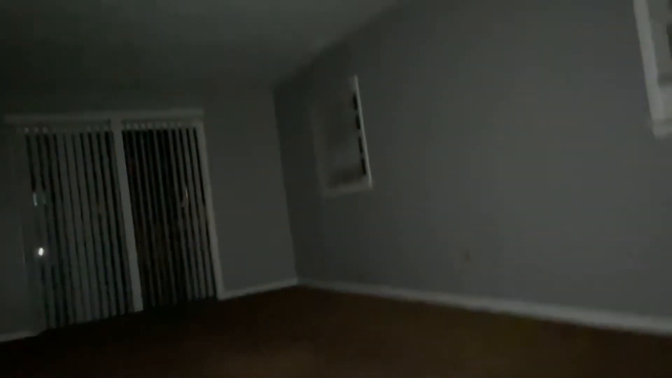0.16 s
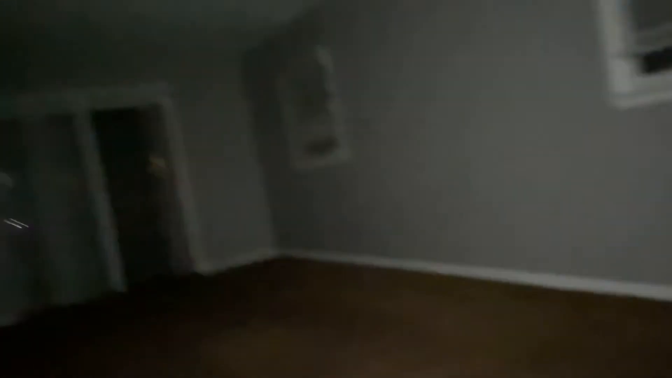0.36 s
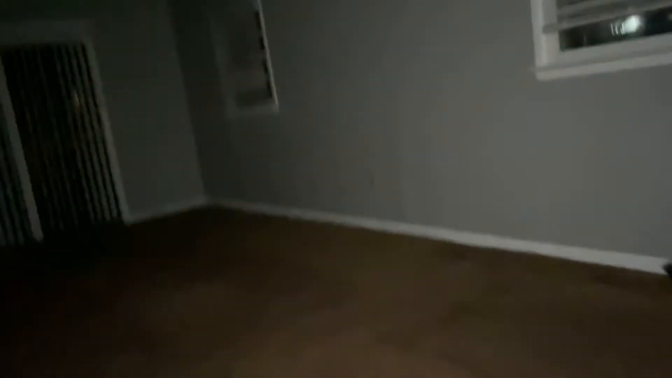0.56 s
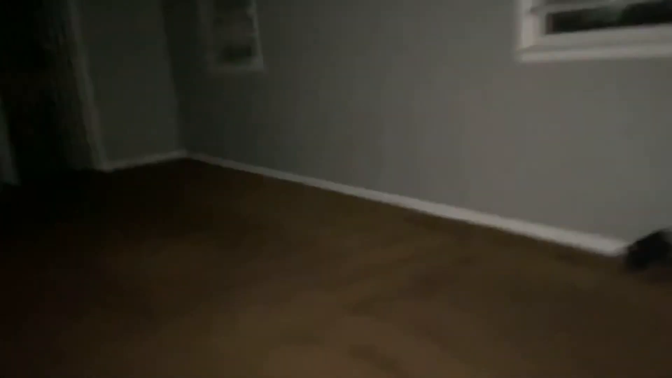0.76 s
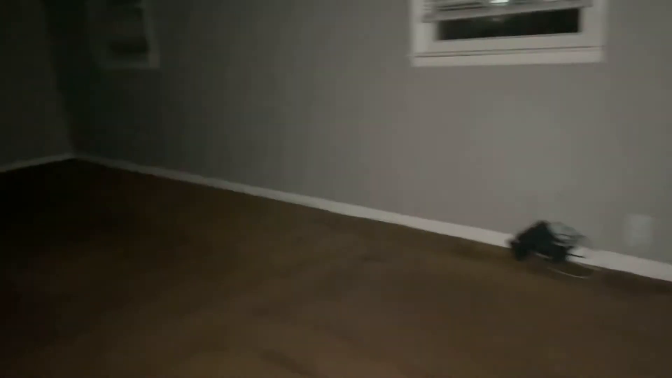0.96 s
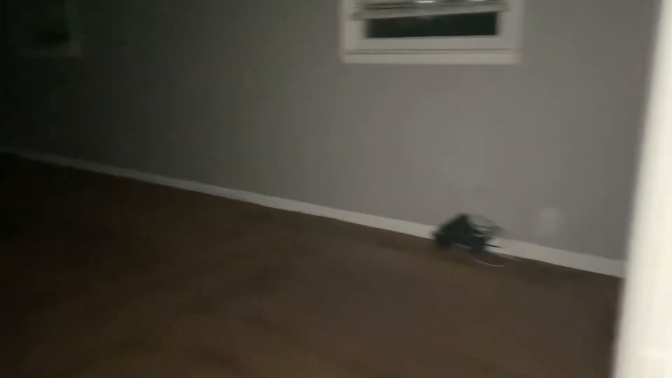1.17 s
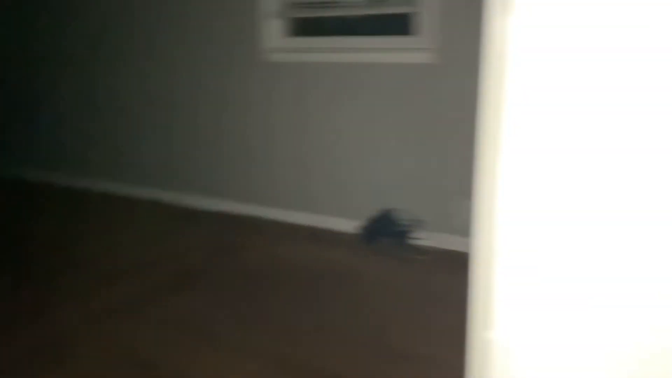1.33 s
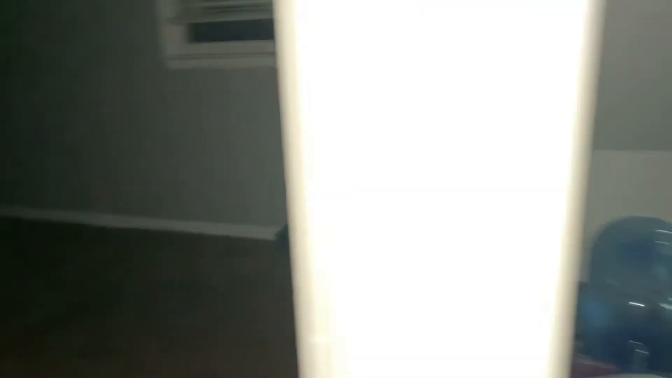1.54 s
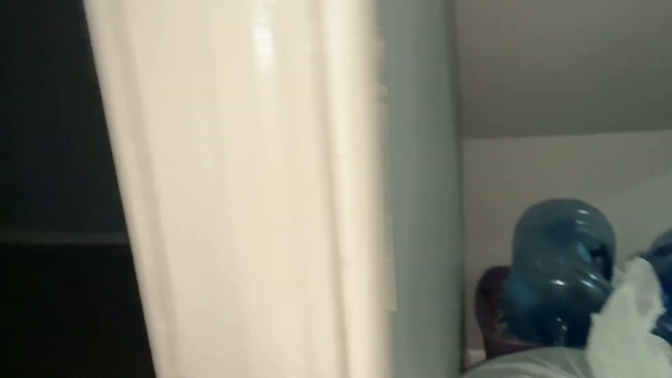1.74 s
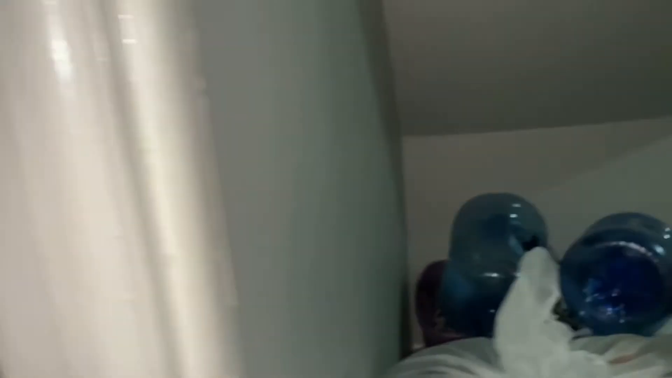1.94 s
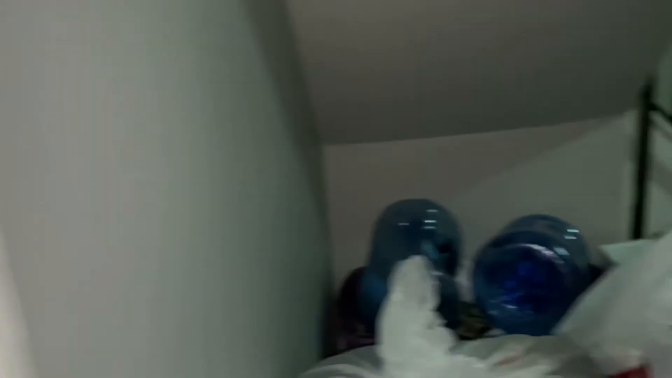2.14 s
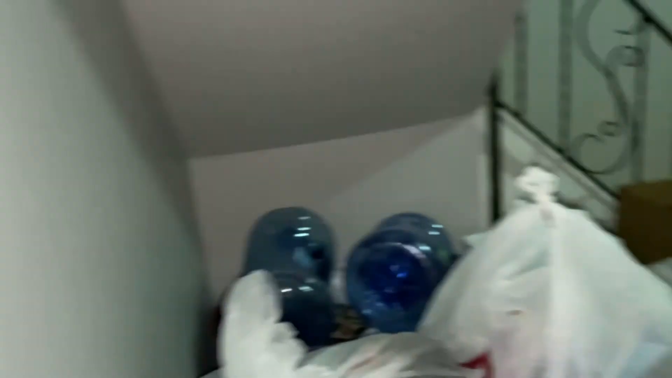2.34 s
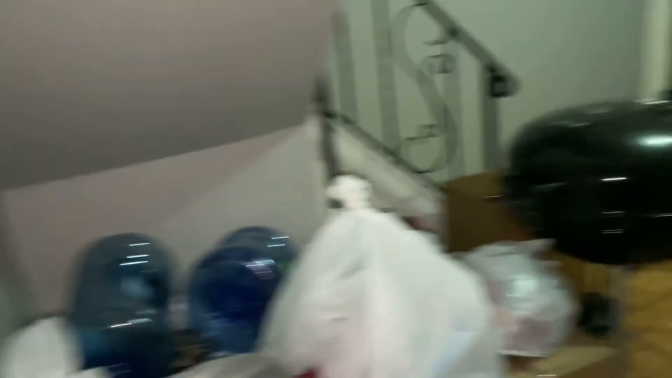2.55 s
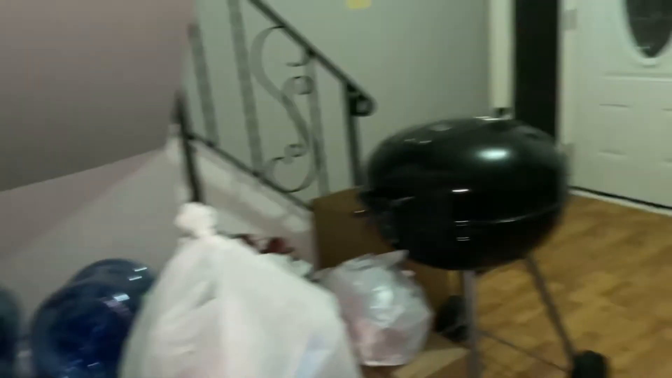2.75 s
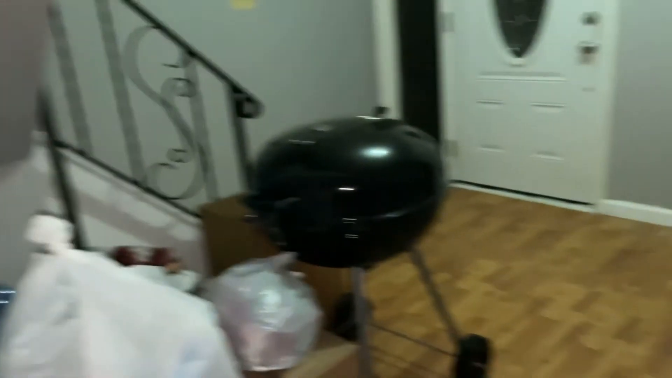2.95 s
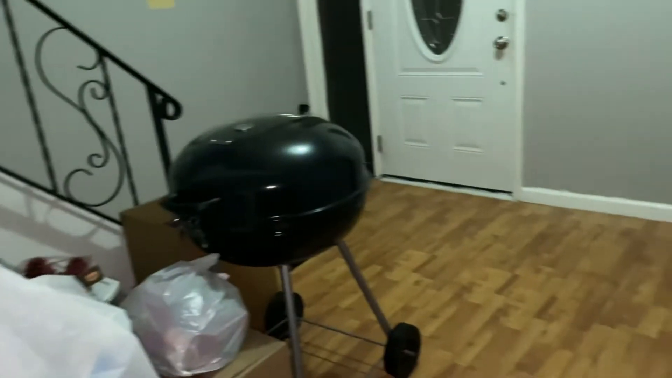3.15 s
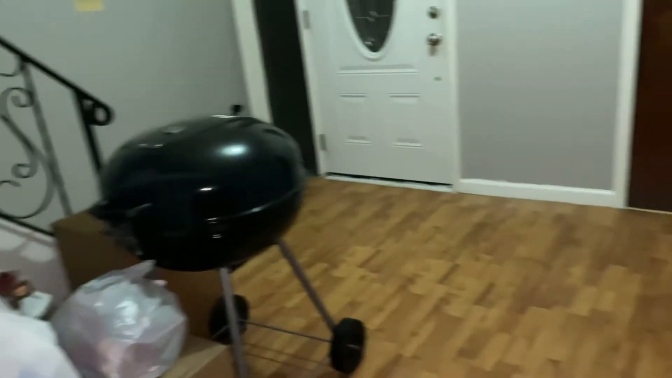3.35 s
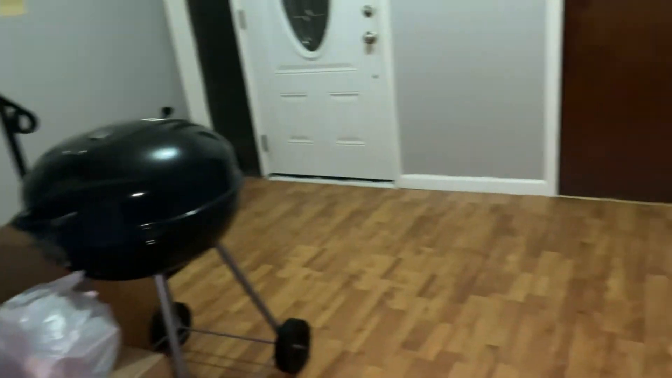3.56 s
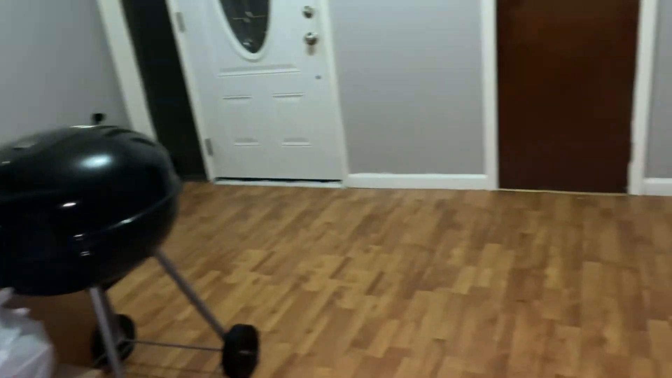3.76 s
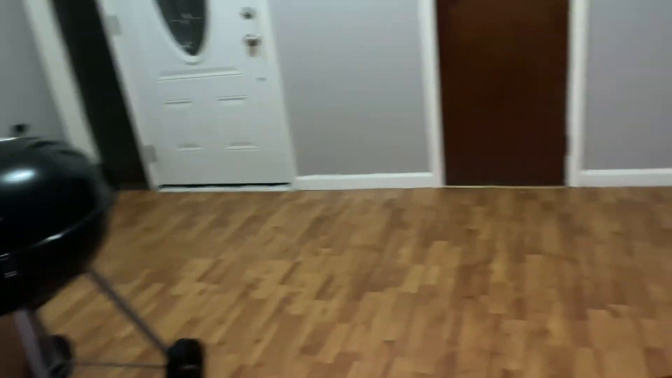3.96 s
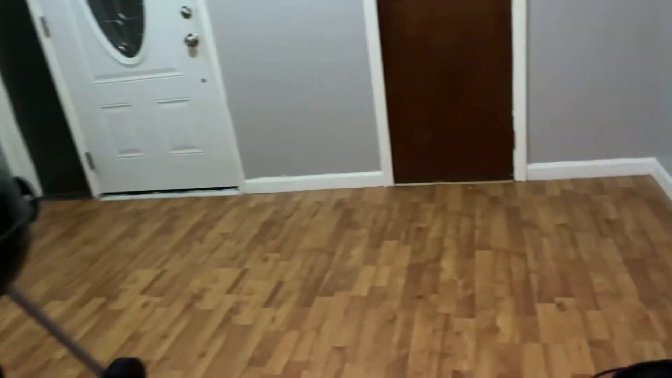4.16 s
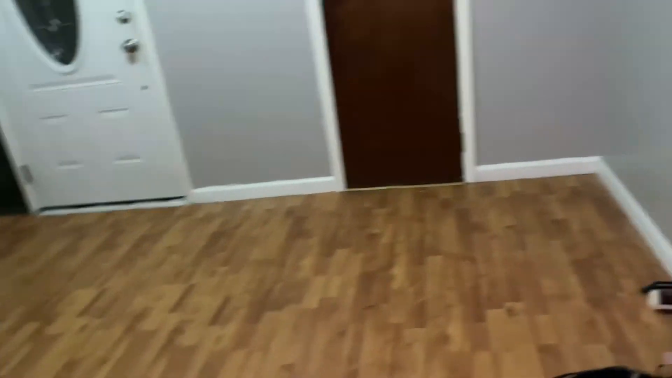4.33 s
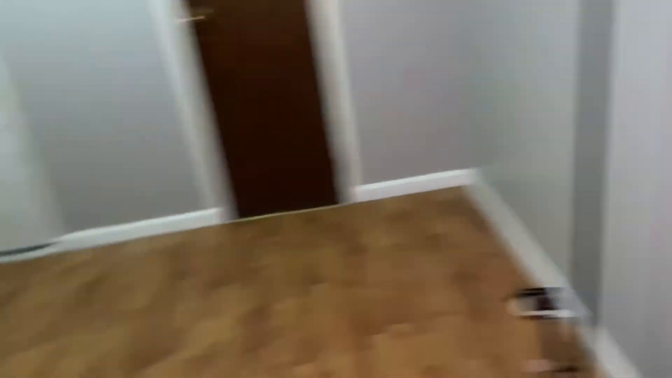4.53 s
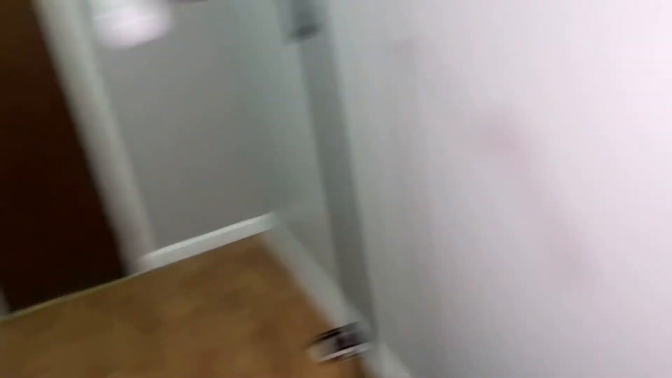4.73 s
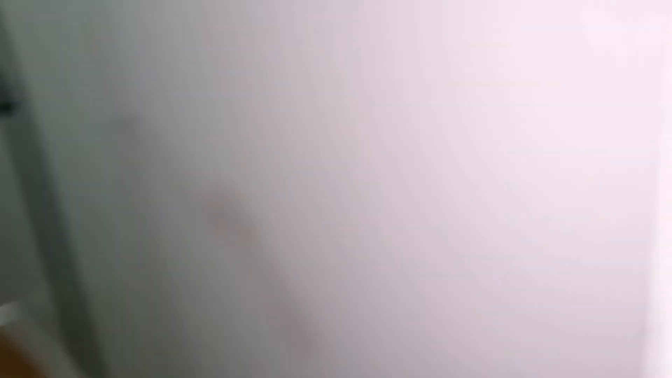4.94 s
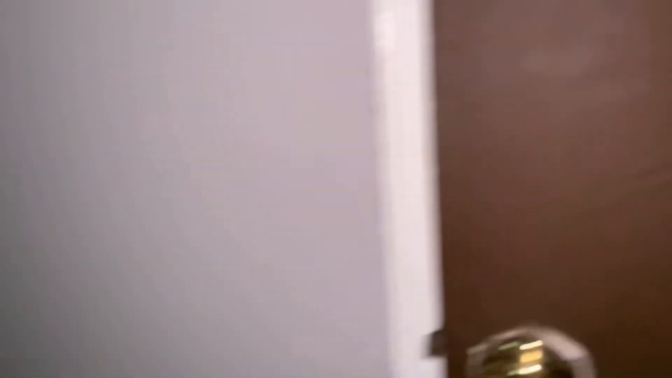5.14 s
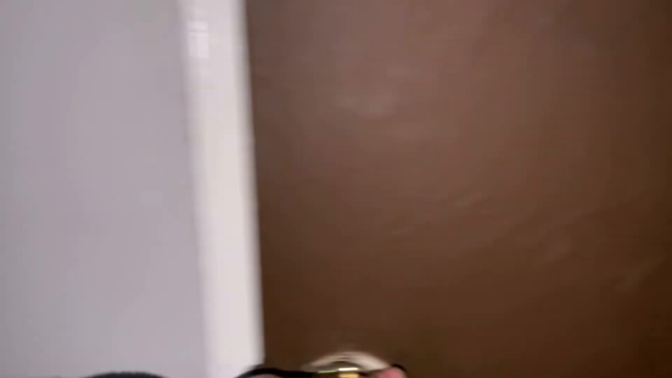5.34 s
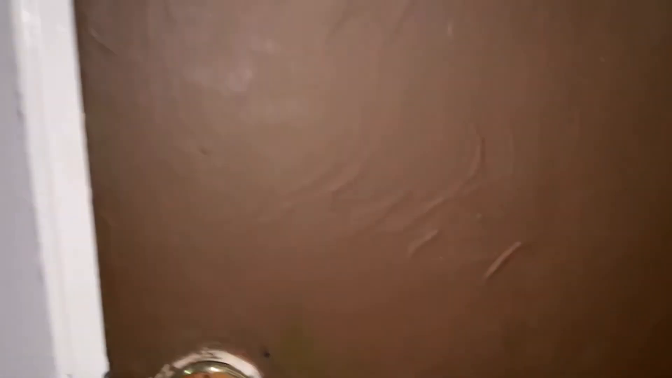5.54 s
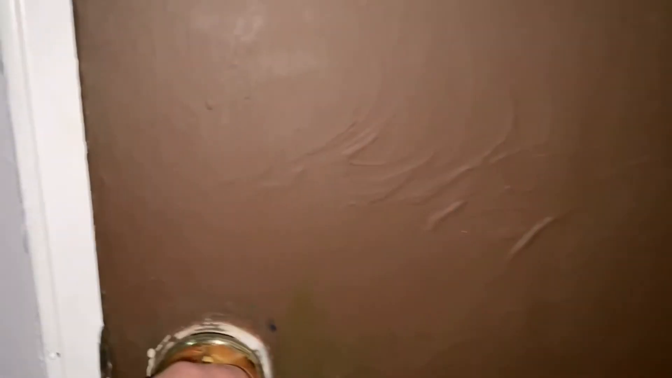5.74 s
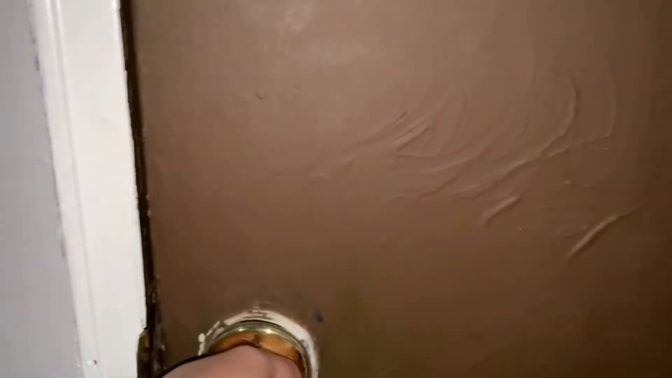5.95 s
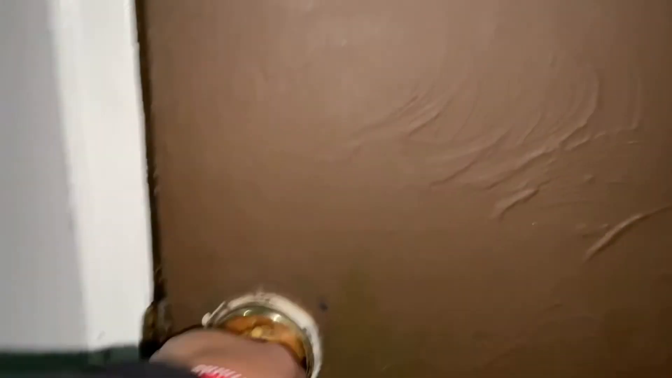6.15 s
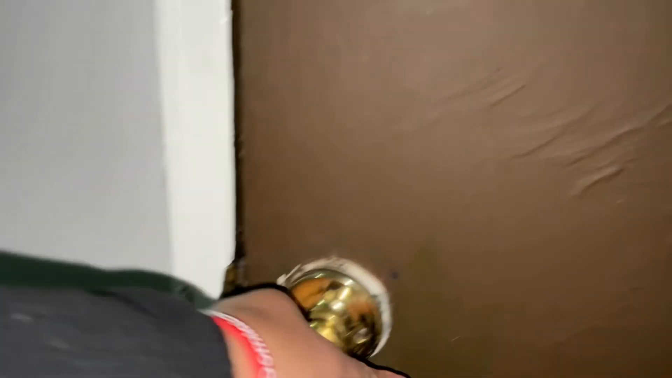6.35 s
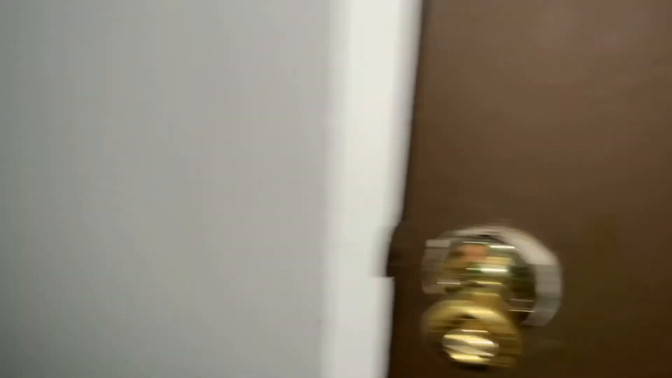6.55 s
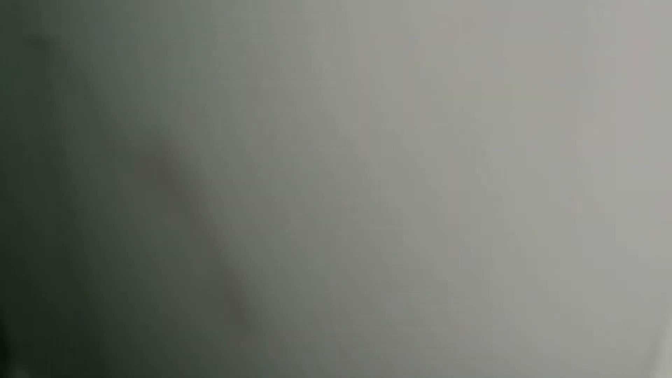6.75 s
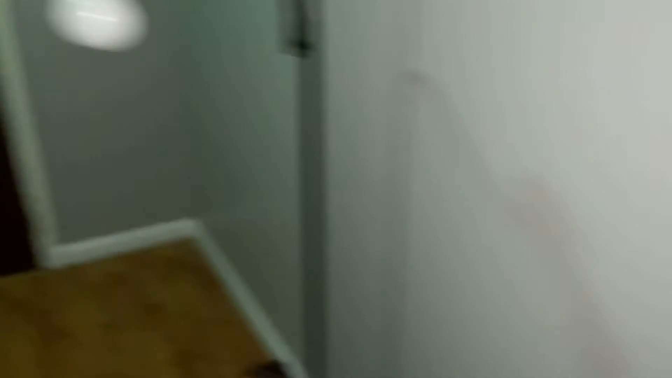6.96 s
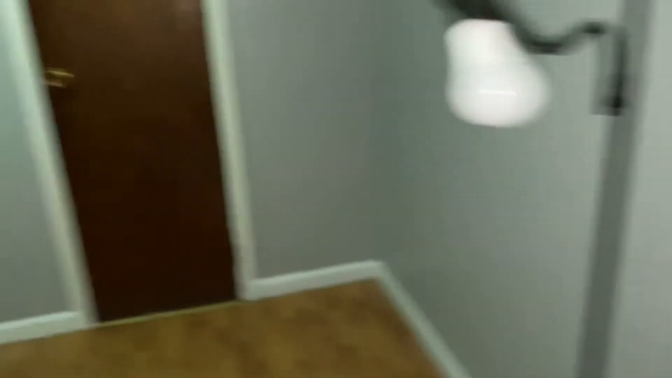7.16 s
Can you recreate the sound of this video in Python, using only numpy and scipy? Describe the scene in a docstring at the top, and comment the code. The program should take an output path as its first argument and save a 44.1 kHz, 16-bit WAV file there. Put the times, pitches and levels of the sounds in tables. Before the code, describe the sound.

Someone walks through a bare house, heard on a handheld phone. A step booms in the floor, keys ping and clothes rustle close by. A few bumps ring the floorboards and echo in the empty rooms. Then a brass knob rattles and a door is pulled shut at arm's length with a loud latch click and thud. The knob ticks on and two soft steps follow, over quiet room tone.

```python
"""Inside a bare house, in stereo on a phone carried in the hand.
First a step booms in the floor, keys ping and clothes rustle close by; small carried things tick.
From about 3 s, bumps ring the boards and the empty rooms. Near 5 s a hand takes a brass knob, and at
5.9 s the door is pulled shut at arm's length. The knob ticks on and two soft steps follow.
Under it all lies quiet room tone, with a low hum that swells now and then."""
import sys
import numpy as np
from scipy import signal
from scipy.fft import rfft, irfft
from scipy.io import wavfile
from scipy.ndimage import uniform_filter1d

SR = 44100
rng = np.random.default_rng(int(sys.argv[2]) if len(sys.argv) > 2 else 0)


def store_wav(level_fs):
    """Save 16-bit WAV to argv[1]."""
    pcm = np.round(np.clip(np.atleast_2d(level_fs), -1, 1) * 32767)
    wavfile.write(sys.argv[1], SR, pcm.T.astype(np.int16))


N = 321685
SEC, HZ = np.arange(N) / SR, np.fft.rfftfreq(N, 1 / SR)

# blows on the door: start_s, panel_db, thud_db, thud_peak_hz, thud_fall_db_per_octave
DOOR_BLOWS = [(5.377, -31.5, -36, 198, 18), (5.616, -20, -30.5, 510, 15), (5.914, -3.5, -13.5, 547, 6),
              (5.9265, -1, -21.5, 195, 9)]
# door panel: pitch_hz, relative_db, t60_s
PANEL_MODES = [(76.2, -6.5, 0.77), (128.6, 7.5, 0.19), (166.5, -9.5, 0.77), (243.7, 0, 0.21),
               (279.7, 5.5, 0.14), (345.5, 7.5, 0.062), (428.3, 5, 0.2), (540, 8, 0.071), (770, -8, 0.23),
               (1137, -7, 0.11), (1330, -4, 0.064), (1710, -12, 0.064), (2280, -15.5, 0.07),
               (2430, -13, 0.042)]
# steps and bumps: start_s, boom_db, boom_hz, boom_t60_s, thud_db, thud_peak_hz, thud_fall_db_per_octave
STEPS = [(0.244, -26, 66.3, 0.38, -45.5, 2430, 22), (0.267, -8, 79, 0.02, -67, 202, -0.5),
         (0.293, -19, 80, 0.1, -61, 202, 8), (0.35, -16.5, 67.6, 0.058, -44.5, 2250, 11.5),
         (2.419, -41, 59.2, 0.2, -40, 554, 5), (3.066, -16, 75, 0.24, -20.5, 201, 7.5),
         (3.139, -10.5, 63.5, 0.086, -34.5, 200, 8), (3.23, -51, 115, 0.24, -34, 710, 14),
         (3.292, -12.5, 129, 0.078, -26.5, 202, 18), (3.342, -29, 48.4, 0.37, -22, 950, 8.5),
         (3.68, -30.5, 68.6, 0.4, -25.5, 525, 14.5), (3.767, -26.5, 49.5, 0.57, -58, 197, 22),
         (4.062, -45, 51, 0.15, -42.5, 714, 6), (4.099, -38.5, 49.3, 0.24, -41.5, 525, 7),
         (4.31, -42.5, 83, 0.33, -33.5, 1090, 8.5), (4.358, -42.5, 200, 0.31, -61, 200, 10),
         (6.862, -29.5, 67, 0.46, -73, 522, 10), (7.034, -35, 75.8, 0.44, -62, 202, 6)]
# floorboards: pitch_hz, relative_db, t60_s
FLOORBOARD_MODES = [(425.5, 4, 0.074), (555.3, -1.5, 0.1), (790, -7.5, 0.14), (1040, -2, 0.065),
                    (1469, -2.5, 0.079), (1602, -5, 0.12), (2362, -8.5, 0.19)]
# sharper bumps and the latch: start_s, first_hz, first_db, second_hz, second_db, room_send_db
HOLLOW_KNOCKS = [(0.3545, 1300, -36, 1800, -30, -22), (0.478, 780, -38, 352, -37, -1),
                 (1.494, 706, -47, 420, -41, -16), (1.6, 470, -40.5, 654, -49, -3),
                 (2.419, 860, -34, 2340, -37.5, -25), (3.068, 1330, -32, 584, -27.5, 0),
                 (3.093, 1460, -34, 870, -35, 2), (3.342, 2400, -23, 4550, -31.5, 0),
                 (3.6805, 715, -20, 1150, -26, -1.5), (4.1, 525, -29, 900, -32, -14),
                 (4.309, 1856, -28.5, 1460, -39.5, 8.5), (5.616, 614, -23, 1000, -27, -4),
                 (5.9124, 4040, -15, 2270, -13.5, -21), (5.9135, 580, 0.5, 1230, -11, -12.5),
                 (5.9172, 530, -6.5, 1760, -19, -8.5), (5.9273, 232, -4, 125, -7.5, -9)]
# small hard things and the knob: start_s, level_db, pitch_hz, snap_relative_db
HARD_TICKS = [(0.134, -17, 3060, -27), (0.189, -27.5, 4100, -16), (0.2654, -31.5, 1670, -28),
              (0.2814, -37, 6660, -25), (0.354, -27, 2840, -46), (0.421, -29.5, 3140, -42),
              (0.4499, -36, 3370, -11), (0.625, -33.5, 3120, -23), (1.1191, -29.5, 3080, -26),
              (1.299, -41.5, 2240, -1), (1.3405, -37.5, 3520, -21), (1.49, -42.5, 2300, -23),
              (1.6384, -43, 3000, -12), (1.945, -50.5, 1890, -2), (2.7732, -38.5, 4070, -14),
              (2.799, -36, 3160, -15), (2.814, -38, 2150, -21), (2.942, -36.5, 3270, -12),
              (4.623, -42.5, 3200, -33), (4.861, -36, 2880, -38), (4.891, -33, 2600, -45),
              (4.9746, -33, 3130, -16), (5.0127, -30.5, 3240, -24), (5.145, -33, 2840, -13),
              (5.226, -29.5, 4970, -31), (5.2613, -32.5, 3240, -33), (5.3756, -29, 4400, -15),
              (5.409, -31, 3130, -3), (5.4284, -34, 4970, -22), (5.4546, -27, 3570, -2),
              (5.839, -45, 4600, 8), (5.887, -35, 900, -3), (5.9136, -28, 2260, 11),
              (6.14, -54.5, 4900, 13), (6.166, -31.5, 3800, -24), (6.175, -34, 3200, -3),
              (6.183, -30, 3100, -15), (6.1945, -27, 3170, -25), (6.216, -33, 3130, -26),
              (6.2367, -34.5, 3920, -34), (6.266, -43, 4430, -17), (6.44, -23.5, 3080, -8),
              (6.461, -42, 3200, -2), (6.478, -34, 3100, -25), (6.489, -34, 3270, -24),
              (6.577, -33.5, 3250, -9), (6.631, -38.5, 3270, -3.5), (6.673, -37.5, 3300, -18),
              (6.6928, -41.5, 3170, -18)]
# brass knob: pitch_hz, relative_db, t60_s
BRASS_MODES = [(3100, -12, .028), (3280, -14, .022), (3850, -15, 0.018)]
# keys: pitch_hz, t60_s
KEY_RINGS = [(4470, 0.072), (6293, 0.038), (11800, 0.023), (13080, 0.069)]
# keys touching: start_s, level_db for each of the four rings, room_send_db
KEY_TOUCHES = [(0.186, -27, -37, -31, -41, -8), (4.064, -51, -64.5, -75, -58, 16),
               (5.3805, -66, -17, -62, -71, -11), (5.403, -63, -46, -36, -52, -10),
               (6.247, -68, -45, -75, -79, 4), (6.33, -102, -47, -84, -79, -19)]
# runs of crackle from grip and fabric: start_s, end_s, level_db
CRACKLE_RUNS = [(0.037, 0.699, -40), (2.56, 2.636, -39.5), (2.76, 2.855, -44), (4.693, 4.752, -39.5),
                (4.832, 4.918, -38.5), (5.136, 5.286, -43), (5.5, 5.757, -61.5), (6.147, 6.325, -40.5),
                (6.453, 6.754, -46)]
# steady stir of walking: time_s, rumble_db, cloth_db
WALK_LEVELS = [(0, -46.5, -56.5), (0.3, -38, -64.5), (0.5, -49.5, -67), (1.3, -47.5, -62),
               (1.85, -51.5, -71), (2.4, -52.5, -66.5), (3.0, -59, -65.5), (3.3, -29, -71),
               (3.75, -39.5, -74), (4.4, -50.5, -67.5), (4.75, -55, -65.5), (5.45, -46, -67),
               (5.8, -37.5, -61.5), (6.2, -38.5, -57.5), (6.5, -45, -60.5), (6.8, -49, -68),
               (7.05, -47.5, -63.5), (7.29, -58.5, -62)]
# single moves of body and arm: start_s, hold_s, rumble_db, scuff_db, cloth_db, sleeve_db
BODY_MOVES = [(0.507, 0.2, -49, -54, -55, -57.5), (0.796, 0.27, -35.5, -37.5, -47.5, -46),
              (2.087, 0.031, -52, -56, -61.5, -65), (3.14, 0.025, -30.5, -38.5, -62, -63),
              (3.343, 0.1, -42, -31, -58, -65), (3.624, 0.025, -50, -42.5, -57.5, -60),
              (5.119, 0.11, -66, -50.5, -51, -50), (5.389, 0.049, -58, -48.5, -55, -50.5),
              (5.528, 0.03, -42, -43, -49, -51.5), (5.633, 0.015, -33.5, -39, -46.5, -49),
              (5.904, 0.034, -50, -31, -44.5, -44.5), (6.25, 0.11, -41, -43, -68.5, -78),
              (6.438, 0.014, -66, -50, -58.5, -56), (6.957, 0.053, -48.5, -71, -83, -59.5)]
# short dry scrapes: start_s, end_s, centre_hz, level_db
SOLE_SCRAPES = [(0.507, 0.659, 1580, -57.5), (5.04, 5.244, 1300, -59.5), (6.284, 6.346, 1510, -58)]
# noise colours of floor, soles, clothes, sleeve and house air: frequency_hz, relative_db
RUMBLE_COLOUR = [(30, -40), (45, 2), (75, -2), (120, -8.5), (200, -18)]
SCUFF_COLOUR = [(60, -5), (150, -1.5), (280, -1), (500, 0), (750, -8), (1500, -16.5), (3000, -39.5)]
CLOTH_COLOUR = [(500, -19.5), (1000, -8), (1600, -2.5), (3200, -4.5), (5000, -7.5), (8000, -13.5)]
SLEEVE_COLOUR = [(2000, -2.5), (5000, -34.5), (8500, 10), (10500, -1.5), (13500, -7), (15000, -6.5),
                 (16000, -32)]
AIR_COLOUR = [(25, -23), (40, 6), (65, 5), (120, -11.5), (160, -2.5), (500, -8), (1200, -13.5), (3000, -22),
              (7000, -48), (13000, -63), (16000, -53.5)]
# swells of low hum: start_s, end_s, pitch_hz, level_db
HUM_SWELLS = [(2.28, 3.087, 59.4, -48.5), (4.422, 4.986, 56, -51), (5.15, 5.46, 52.2, -49),
              (5.999, 6.283, 58.7, -33.5)]
# echo of the empty rooms: low_hz, high_hz, early_t60_s, late_t60_s, late_relative_db
ROOM_BANDS = [(131, 352, 0.19, 0.68, 4.5), (320, 900, 0.29, 0.48, -7), (790, 2620, 0.035, 0.74, -2),
              (2100, 5060, 0.06, 0.52, 1), (4900, 12150, 0.1, 0.35, 11)]
# stereo image, alike in the bass and wider above: frequency_hz, left_lead_rad, side_share, lean_left_db
STEREO_IMAGE = [(0, 0.62, 0, -0.5), (252, 0.019, 0.45, -0.5), (536, 0.99, 0.64, 1), (1145, -0.33, 1, 1),
                (2067, 1, 0.83, -1.5), (4200, 1, 0.54, 1.5), (5600, -1.36, 0.8, 2.5),
                (6620, 0.0015, 0.85, 2)]
# stereo image, opposed at 8-9.4 kHz and nearly mono above 12 kHz: same columns
TREBLE_STEREO_IMAGE = [(7900, -np.pi, .03, 0), (9400, -np.pi, .03, 0), (10800, -4.6, .5, 0),
                       (12200, -2 * np.pi, .12, 0)]


def door():
    """Each blow rings the panel at arm's length, slightly detuned; the low modes speak late."""
    out = np.zeros(N)
    for start, panel_db, *_ in DOOR_BLOWS:
        for hz, mode_db, t60 in PANEL_MODES:
            detune = 1 + 0.0072 * rng.standard_normal()
            add(out, start, undb(panel_db + mode_db - 15.5) * ring(hz * detune, t60, rise_s=0.6 / hz))
    return out


def footsteps(rattle_s=0.03, rattle_db=-4):
    """Steps and bumps boom in the floor below the phone; loose boards ring and rattle on."""
    out = np.zeros(N)
    for start, boom_db, boom_hz, boom_t60, thud_db, peak_hz, fall in STEPS:
        add(out, start, undb(boom_db) * ring(boom_hz, max(boom_t60, 0.05), rise_s=0.0048))
        for hz, board_db, t60 in FLOORBOARD_MODES:
            level_db = thud_db + board_db - thud_rolloff_db(hz, peak_hz, fall)
            for k, (bend, late) in enumerate(rng.random((3, 2))):
                board = ring(hz * (0.97 + 0.0605 * bend), t60, rise_s=0.0023)
                add(out, start + k * rattle_s * late, undb(level_db + k * rattle_db) * board)
    return out


def room_thuds(room):
    """Every step and door blow comes back from the rooms, band by band."""
    impulses = np.zeros((len(ROOM_BANDS), N))
    centres_hz = np.array([np.sqrt(lo * hi) for lo, hi, *_ in ROOM_BANDS])
    for start, *_, db, peak_hz, fall in STEPS + DOOR_BLOWS:
        add(impulses, start, undb(db - thud_rolloff_db(centres_hz, peak_hz, fall))[:, None])
    return sum(echoed(impulse, echo) for impulse, echo in zip(impulses, room))


def knocks():
    """Sharp bumps and the latch ring two short hollow notes; gives direct sound and room send."""
    direct, send = np.zeros((2, N))
    for start, hz1, db1, hz2, db2, send_db in HOLLOW_KNOCKS:
        for hz, db in ((hz1, db1), (hz2, db2)):
            add(direct, start, undb(db) * ring(hz, t60=0.009 + 5 / hz, rise_s=0.0004))
            add(send, start, undb(db + send_db - 3) * ring(hz, t60=0.0225))
    return direct, send


def hard_ticks(knob_reached_s=4.95, bounce_s=0.011):
    """Small hard things tick and bounce twice; once the knob is reached, ticks also ring its brass."""
    out = np.zeros(N)
    for start, db, hz, snap_db in HARD_TICKS:
        add(out, start - 0.0004, undb(db) * tick(hz, snap_db))
        if start > knob_reached_s:
            for brass_hz, brass_db, t60 in BRASS_MODES:
                bend, size = rng.uniform(-1.35, 1, 2)
                mismatch_db = 30 * abs(np.log2(hz / brass_hz))  # a tick far from a mode rings it less
                brass = ring(brass_hz * (1 + 0.025 * bend), t60)
                add(out, start, undb(db + brass_db + 4 * size - mismatch_db) * brass)
        for k, chance in enumerate(rng.random(2)):
            bounce = tick(hz * (0.98 + 0.088 * chance), snap_db - 0.5)
            add(out, start + bounce_s * (k + 0.51 + chance), undb(db - 14 - 7 * k) * bounce)
    return out


def tick(hz, snap_db):
    """One dry contact: a snap of treble, a spit of grit and three very short rings."""
    noise, t = rng.standard_normal(600), SEC[:600]
    snap = band(noise, 4200, 13000) * undb(snap_db) * decay(t, t60=0.025)
    grit = band(noise, 0.23 * hz, 1.81 * hz) * undb(-8) * decay(t, t60=0.011)
    out = snap + grit
    for ratio, gain in ((1, 1.5), (1.045 + 0.4 * rng.random(), 0.7), (0.5 + 0.32 * rng.random(), 0.7)):
        add(out, 0, gain * ring(ratio * hz, t60=0.0075, rise_s=0.0004))
    return out


def keys():
    """Carried keys touch and ping in four high modes; gives direct sound and room send."""
    direct, send = np.zeros((2, N))
    for start, *levels_db, send_db in KEY_TOUCHES:
        for (hz, t60), db in zip(KEY_RINGS, levels_db):
            add(direct, start, undb(db) * ring(hz, t60, rise_s=0.006))
            add(send, start, undb(db + send_db) * ring(hz, t60 / 6))
    return direct, send


def grip_crackle(ticks_per_s=380):
    """Grip and fabric crackle right at the phone in runs of faint ticks."""
    out = np.zeros(N)
    for start, end, db in CRACKLE_RUNS:
        for when, softness, pitch in rng.random((int((end - start) * ticks_per_s), 3)):
            grain = tick(2300 * (1 + 0.55 * pitch), snap_db=-24.5)
            add(out, start + when * (end - start), undb(db - 7 - 15 * softness) * grain)
    return out


def walker(rise_db_per_s=219, fall_db_per_s=112.5):
    """Close by, the floor rumbles, soles scuff, clothes rustle and a sleeve swishes with each move."""
    times, rumble_db, cloth_db = np.transpose(WALK_LEVELS)
    rumble_db, cloth_db = np.interp(SEC, times, rumble_db), np.interp(SEC, times, cloth_db)
    power = undb([rumble_db, rumble_db - 9.5, cloth_db, cloth_db - 1]) ** 2
    for start, hold, *levels_db in BODY_MOVES:
        before_s, after_s = np.maximum(start - SEC, 0), np.maximum(SEC - start - hold, 0)
        swell = undb(-rise_db_per_s * before_s - fall_db_per_s * after_s)
        power += np.outer(undb(levels_db), swell) ** 2
    rumble, scuff, cloth, sleeve = np.sqrt(power)
    grains = undb(3.04 * wander(200))
    return (rumble * hiss(RUMBLE_COLOUR, flicker_db=3.5, rate_hz=9)
            + scuff * hiss(SCUFF_COLOUR, flicker_db=2, rate_hz=25)
            + sole_scrapes()
            + cloth * grains * hiss(CLOTH_COLOUR, flicker_db=1.5, rate_hz=8.1)
            + sleeve * hiss(SLEEVE_COLOUR, flicker_db=4, rate_hz=5.9))


def sole_scrapes():
    """A sole scrapes the floor: a short, rough, narrow band of noise."""
    out = np.zeros(N)
    for start, end, hz, db in SOLE_SCRAPES:
        swell = fade(start, end, ramp_s=0.026) * undb(db + 3 * wander(70))
        out += swell * unit(band(rng.standard_normal(N), hz / 1.13, hz * 1.1))
    return out


def room_tone():
    """Quiet air of the house, and swells of a low hum with a faint octave."""
    out = undb(-60.5) * hiss(AIR_COLOUR, flicker_db=0.5, rate_hz=0.74)
    waver = undb(0.78 * wander(28))
    for start, end, hz, db in HUM_SWELLS:
        hum = np.sin(2 * np.pi * hz * SEC) + undb(-19.5) * np.sin(4 * np.pi * hz * SEC)
        out += fade(start, end, ramp_s=0.19) * waver * np.sqrt(2) * undb(db) * hum
    return out


def empty_rooms(build_cycles=2):
    """Stereo echo of each band: a build-up, slowest in the lows, an early fall and a long tail."""
    t, echoes = SEC[:SR], []
    for lo, hi, early_t60, late_t60, late_db in ROOM_BANDS:
        noise = unit(band(band(rng.standard_normal((2, SR)), lo, hi), lo, hi))
        fall = (decay(t, early_t60) + undb(late_db) * decay(t, late_t60)) / 2
        build = 1 - np.exp(-t * lo / build_cycles)
        echoes.append(noise * fall * build)
    return echoes


def thud_rolloff_db(hz, peak_hz, fall_db_per_octave, rise_db_per_octave=5.5):
    """How far a thud's spectrum lies under its peak at hz."""
    octaves = np.log2(hz / peak_hz)
    return np.maximum(fall_db_per_octave * octaves, -rise_db_per_octave * octaves)


def ring(hz, t60, rise_s=0):
    """One mode, struck once; a soft contact makes it swell in."""
    t = SEC[:int(1.5 * t60 * SR)]
    return np.sin(2 * np.pi * hz * t) * decay(t, t60) * (1 - np.exp(-t / (rise_s + 1 / SR)))


def hiss(colour, flicker_db, rate_hz):
    """Two unrelated noises of the given colour; each octave flickers alone."""
    hz, db = np.transpose(colour)
    octave = np.log2(np.maximum(HZ, 1))
    spectrum = rfft(rng.standard_normal((2, N))) * undb(np.interp(octave, np.log2(hz), db, -99, -99))
    out = np.zeros((2, N))
    for mid in range(int(np.log2(hz[0])), int(np.log2(hz[-1])) + 2):
        window = np.clip(1 - abs(octave - mid), 0, 1)
        out += irfft(spectrum * window, N) * undb(flicker_db * wander(rate_hz))
    return unit(out)


def wander(rate_hz):
    """Glides between random levels, rate_hz of them a second."""
    hold = int(SR / rate_hz)
    return 0.78 * uniform_filter1d(np.repeat(rng.standard_normal(N // hold + 1), hold), hold)[:N]


def decay(t, t60):
    return undb(-60 * t / t60)


def fade(start, end, ramp_s):
    return np.clip(np.minimum(SEC - start, end - SEC) / ramp_s, 0, 1)


def undb(db):
    return 10 ** (np.asarray(db) / 20)


def unit(x):
    return x / np.sqrt(np.mean(x ** 2))


def band(x, lo_hz, hi_hz):
    return signal.sosfilt(signal.butter(2, [lo_hz, hi_hz], "band", fs=SR, output="sos"), x)


def add(out, start_s, x):
    i = int(start_s * SR)
    out[..., i:i + x.shape[-1]] += x[..., :N - i]


def echoed(x, response):
    return signal.fftconvolve(np.atleast_2d(x), response, axes=-1)[:, :N]


def scene():
    """Near sounds and their echoes over the room tone; the small ones skip the lowest room band."""
    room = empty_rooms()
    blows = door() + footsteps() + room_thuds(room)
    ticks = hard_ticks() + grip_crackle()
    knock_direct, knock_send = knocks()
    key_direct, key_send = keys()
    upper_room = sum(room[1:])
    upper_room /= np.linalg.norm(upper_room[0])
    echo = echoed(undb(-12) * ticks + knock_send + key_send, upper_room)
    return blows + ticks + knock_direct + key_direct + echo + walker() + room_tone()


def record(dry):
    """Left and right: alike in the bass, opposed at 8-9.4 kHz, nearly mono above 12 kHz; 16 kHz cut."""
    hz, lead_rad, side_share, lean_db = np.transpose(STEREO_IMAGE + TREBLE_STEREO_IMAGE)
    cavity_db = 3 * np.exp(-((HZ - 13500) / 2000) ** 2)  # resonance of the microphone's small cavity
    left, right = rfft(dry) * undb(cavity_db)
    mid = (left + right) / 2
    side = (left - right) / 2 * np.interp(HZ, hz, side_share)
    offset = np.exp(0.5j * np.interp(HZ, hz, lead_rad)) * undb(np.interp(HZ, hz, lean_db) / 2)
    stereo = irfft(np.array([(mid + side) * offset, (mid - side) / offset]), N)
    return signal.sosfilt(signal.ellip(8, 0.2, 70, 16000, fs=SR, output="sos"), stereo)


dry = scene()
out = record(dry)
store_wav(out)
```